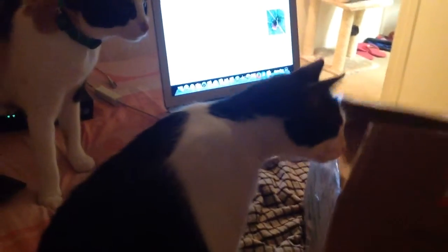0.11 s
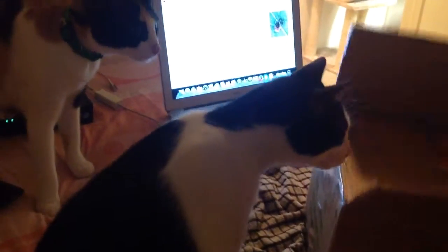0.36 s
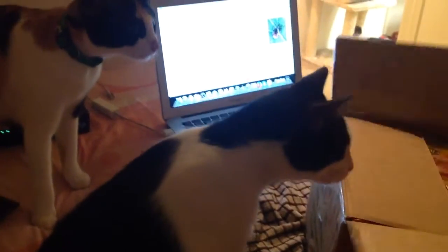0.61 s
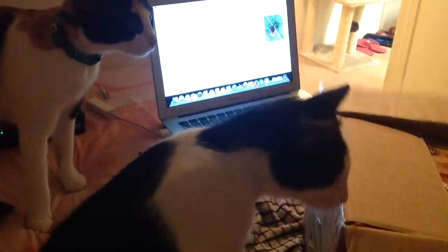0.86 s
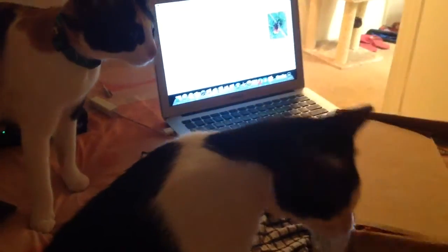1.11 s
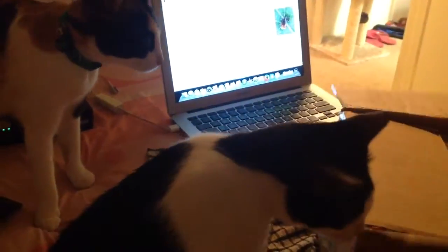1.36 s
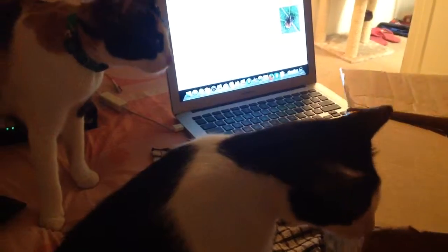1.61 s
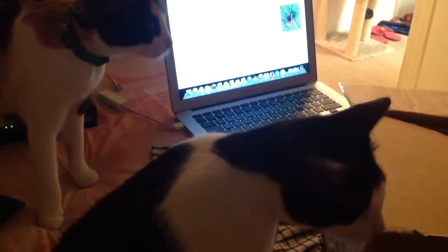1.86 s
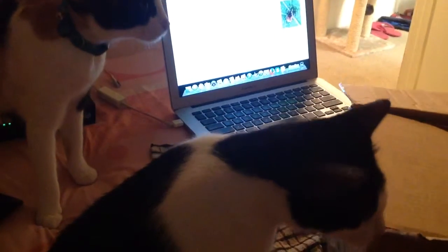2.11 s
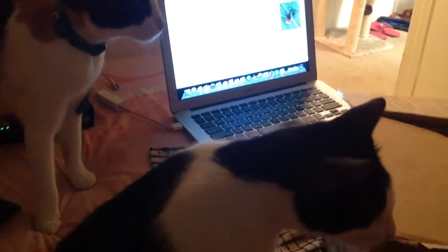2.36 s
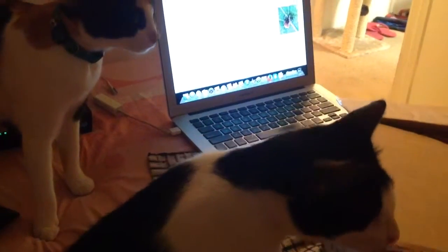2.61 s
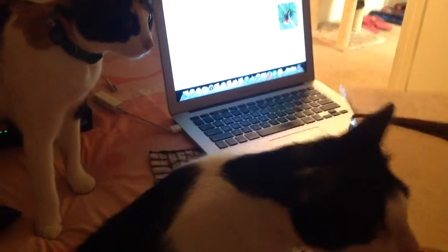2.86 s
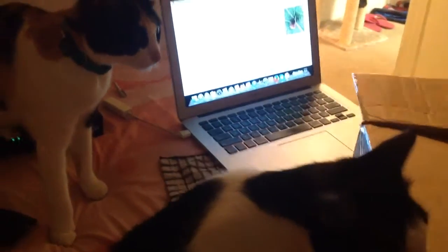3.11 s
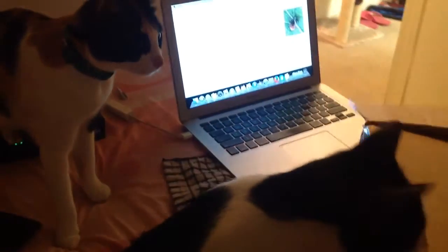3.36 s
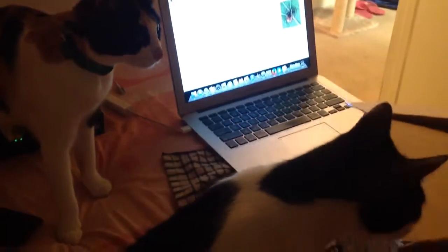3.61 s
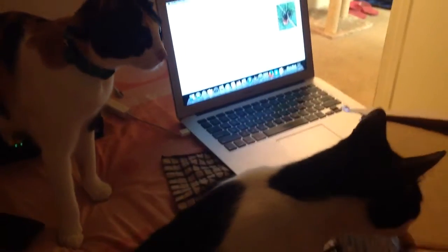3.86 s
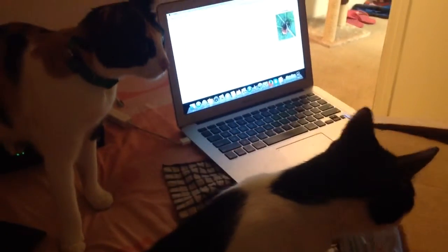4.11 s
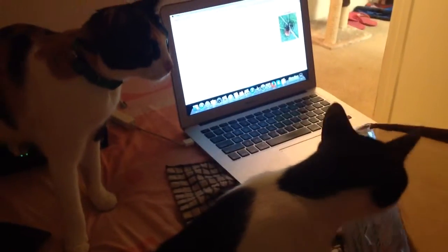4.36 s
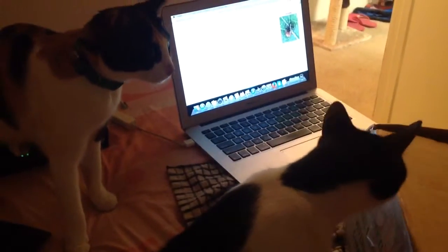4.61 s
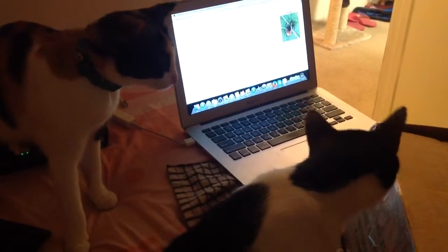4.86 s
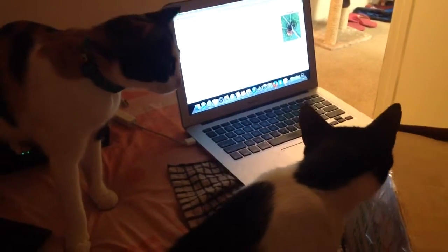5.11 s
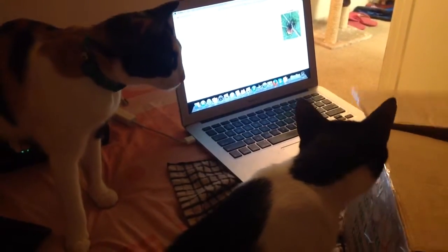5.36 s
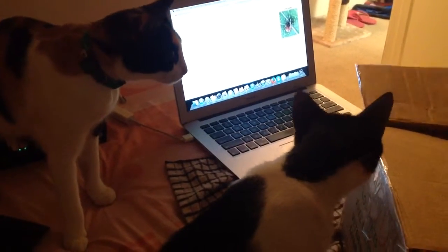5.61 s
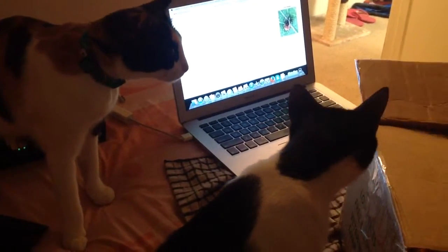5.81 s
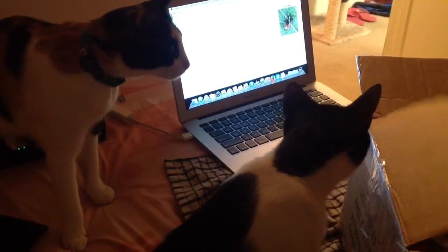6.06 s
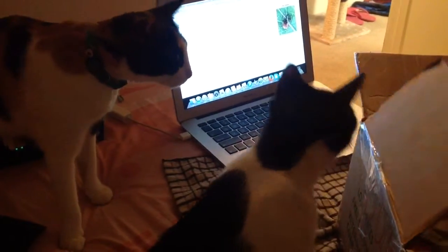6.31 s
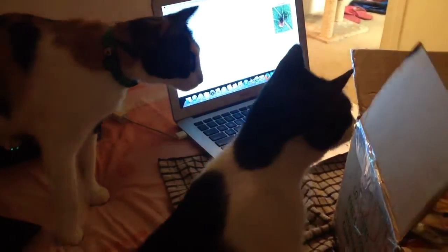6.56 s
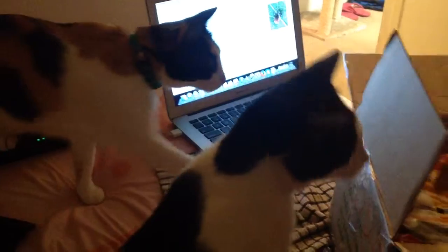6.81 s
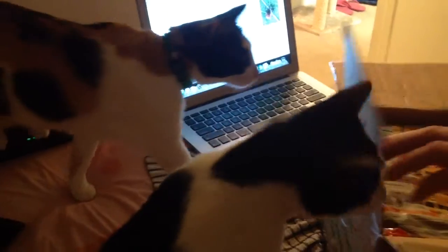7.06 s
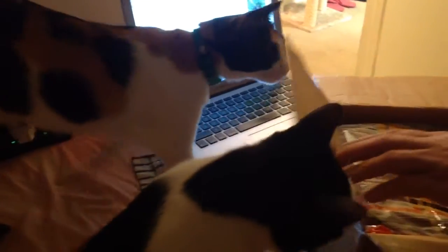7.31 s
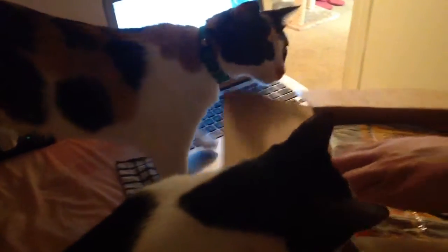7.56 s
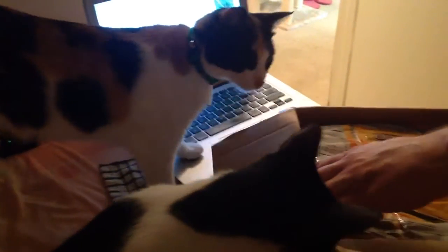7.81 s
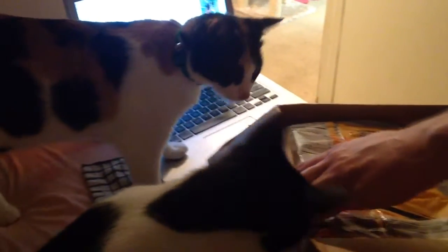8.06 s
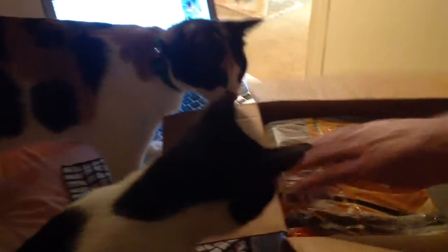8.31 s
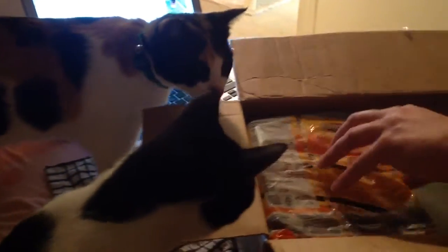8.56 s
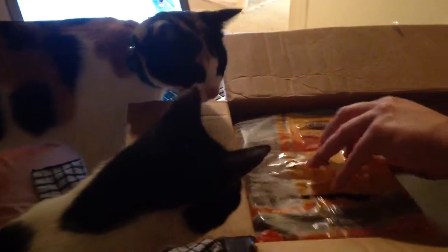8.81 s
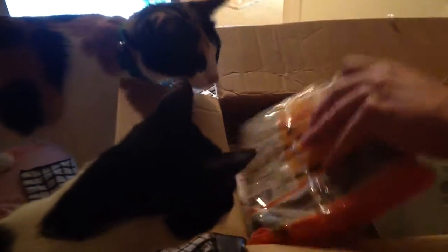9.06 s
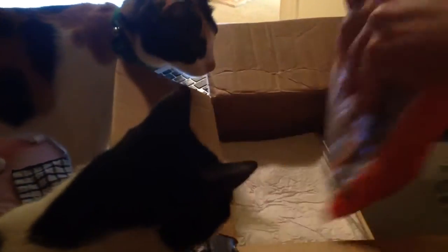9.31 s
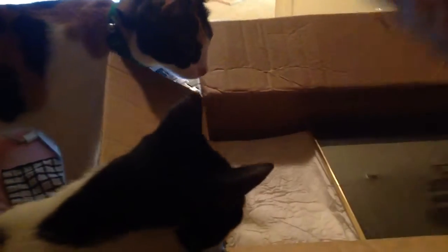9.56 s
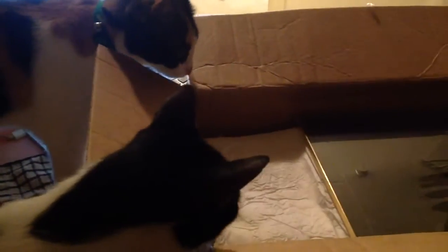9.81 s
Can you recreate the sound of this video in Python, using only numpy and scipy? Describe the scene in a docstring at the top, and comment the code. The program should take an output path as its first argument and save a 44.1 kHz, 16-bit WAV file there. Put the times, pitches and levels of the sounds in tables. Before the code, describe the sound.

Close handling of a cardboard box: sharp snaps, soft rubs and brief flap creaks over faint hiss, then loud crinkling of plastic.

```python
"""A cardboard box is opened on a bed in a small quiet room, close to a phone, over hiss and faint hum.
Light snaps and rubs come first, a flap creaks near 0.7 and 1 s, tape and plastic snap hard from 1.7 to 3 s;
sparser handling follows, with a creak near 4 s, then a dense, loud crackle from 8.6 s to the end.
Snaps are decaying noise bursts, rubs are swelling hiss and crackle, creaks are stick-slip pulses in a
resonant flap; all are filtered to the range of cardboard and followed by echoes that swell in milliseconds."""
import sys
import numpy as np
from scipy import signal
from scipy.fft import rfft, irfft, next_fast_len
from scipy.io import wavfile
from scipy.ndimage import uniform_filter1d

SR = 44100
rng = np.random.default_rng(int(sys.argv[2]) if len(sys.argv) > 2 else 0)


def ratio(d):
    """dB to gain"""
    e = np.asarray(d, float) / 20
    return 10 ** e


def to_wav(sig):
    """Store sig (one row per channel, or 1-D mono) as 16-bit WAV at the path in sys.argv[1].

    Samples outside -1..1 are clipped; the rate is SR.
    """
    pcm = np.clip(np.atleast_2d(sig), -1, 1) * 32767
    pcm = np.round(pcm).astype(np.int16)
    wavfile.write(sys.argv[1], SR, pcm.T)  # frames by channels


N = 437913
TIME_S = np.arange(N) / SR

# room air and hiss spectrum: (frequency [Hz], relative density [dB per Hz])
AIR_SPECTRUM = [(15, -61), (25, -35), (49, -23), (87, -18), (127, -2), (301, -6), (344, -5), (560, -10),
                (677, -6.5), (962, -12), (1440, -12), (14800, -20.5), (16000, -15)]
# hum tones: (frequency [Hz], mean level [dB rms])
HUM_TONES = [(59.5, -96.5), (119, -86.5), (140, -83)]
# cardboard modes: (frequency [Hz], width [Hz], gain [dB])
CARDBOARD_MODES = [(200, 80, -12), (283, 48, 0.5), (460, 58, 3), (612, 68, -6), (837, 280, -9.5),
                   (1026, 35, -11.5), (1350, 116, -14)]
# flap resonances: (frequency [Hz], width [Hz], gain [dB])
FLAP_MODES = [(417, 43, 6.5), (2350, 370, -3), (3520, 1000, 0.5), (4830, 960, -1.5), (8400, 5400, -3.5),
              (13500, 3000, -8)]
# vibrating parts: (low edge [Hz], high edge [Hz], shortest snap decay [ms], smooth share of rustle power [0-1],
# room t60 [s], echo gain [dB])
PARTS = [(160, 496, 4.7, 0.68, 0.24, 3.5), (614, 1490, 1.95, 0.49, 0.24, 4),
         (1610, 3400, 0.13, 0.3, 0.27, 2), (3880, 6700, 0.23, 0.35, 0.27, 2.5),
         (7530, 14240, 0.14, 0.47, 0.26, 5.5)]
# creaking flap, one list a creak: (time [s], slip rate [1/s], relative level [dB])
CREAKS = [
    [(.646, 90, -62), (0.6661, 96, -53), (.683, 87, -52), (0.717, 62, -47.5), (.74, 79, -47.5),
     (.771, 85, -51), (.787, 113, -46.5), (.805, 90, -43), (0.821, 96, -50), (.846, 47, -51),
     (.87, 58, -68)],
    [(1.016, 56, -57), (1.05, 55, -48)],
    [(4.037, 92, -59), (4.07, 88, -58), (4.11, 71, -63)],
]
# rubs and rustles by hands and paws: (loudest time [s], nominal length [s], dry level [dB rms],
# strongest pitch [Hz], fall below it [dB per octave], fall above it [dB per octave])
RUBS = [(0.01, 0.067, -65, 860, 7, 0.5), (0.117, 0.15, -67.5, 5790, 0, 0),
        (0.202, 0.076, -58.5, 6890, 1, -5), (0.364, 0.13, -68.5, 8190, 2, 2),
        (0.792, 0.088, -64, 6650, 1.5, 11), (0.94, 0.12, -71, 800, 7, 0.5), (1.218, 0.091, -56, 920, 8, 2),
        (1.284, 0.14, -57, 1210, 6.5, 0.5), (1.42, 0.15, -68, 1400, 8, 0.5),
        (1.691, 0.14, -72, 4000, 0.5, 3), (1.865, 0.16, -71, 6890, 0.5, 10),
        (1.944, 0.11, -59, 5790, 8, 12), (2.05, 0.084, -58.5, 1140, 7, 3.5),
        (2.132, 0.08, -65.5, 6890, 0.5, 5), (2.3, 0.16, -69.5, 3330, 1.5, 3),
        (2.493, 0.1, -64, 6650, 1.5, -1), (2.616, 0.14, -79.5, 2900, -2.5, 6),
        (2.973, 0.18, -55.5, 3100, 5.5, 5), (3.118, 0.21, -70, 3000, 2.5, -0.5),
        (3.275, 0.17, -68, 2120, 2, 0), (3.386, 0.069, -64.5, 1400, 1, 3), (3.51, 0.18, -66.5, 1450, 6, 2),
        (3.765, 0.11, -69.5, 900, 2, 0.5), (3.809, 0.084, -53, 500, 9, 4), (3.836, 0.055, -48, 4280, 3, 6),
        (3.87, 0.19, -65, 6000, 4, 1), (4.05, 0.43, -75, 3440, 2.5, 2.5),
        (5.168, 0.19, -60.5, 7000, 4.5, 1.5), (5.278, 0.16, -65, 7000, 6, 0),
        (5.397, 0.098, -73.5, 3000, 8, 2), (5.69, 0.16, -72.5, 4000, 6, 6), (5.898, 0.14, -73.5, 920, 3, 0),
        (6.66, 0.23, -73, 270, 25, 4), (7.296, 0.25, -86, 800, 11, -1.5), (7.495, 0.082, -69, 2800, 5, -1),
        (7.66, 0.08, -62, 7380, 13, 0), (7.8, 0.14, -66, 4710, 3, -1.5), (7.997, 0.12, -76, 7130, 1, 3),
        (8.288, 0.16, -62.5, 4240, 7, 2.5), (8.418, 0.11, -69.5, 3440, 9, -3),
        (8.565, 0.084, -68, 4100, 3, 6), (8.662, 0.072, -46, 2040, 5.5, 21),
        (8.869, 0.13, -56, 6000, 1, 13), (8.991, 0.12, -41.5, 1670, 6, 4),
        (9.112, 0.14, -45.5, 3440, 4.5, 3.5), (9.213, 0.15, -42.5, 3570, 4.5, 11),
        (9.36, 0.074, -48.5, 1400, 9, 2), (9.445, 0.065, -48.5, 1910, 5, 2),
        (9.56, 0.08, -45, 4800, 2.5, 5), (9.655, 0.13, -58.5, 3330, 3, 4), (9.78, 0.2, -67, 2440, 4, 2),
        (9.92, 0.14, -53, 1260, 11, 4.5)]
# snaps and taps: (time [s], dry level [dB rms over 1 ms], ring of the struck patch [Hz],
# fall below it [dB per octave], fall above it [dB per octave])
SNAPS = [(0.0549, -44.5, 494, 5, 3), (0.0748, -43, 5730, 10, 10), (0.1753, -37, 1660, -0.5, -0.5),
         (0.4055, -54, 6890, 0, 1), (0.4597, -45, 300, 4, 0), (0.51, -53, 1910, 4, 1),
         (1.0583, -50.5, 8480, 1, 9), (1.073, -58, 3500, 7, 0), (1.654, -55, 2010, 4, 0.5),
         (1.6793, -37, 4300, 5, 10), (1.7903, -35, 5000, 7, -1), (1.9117, -44.5, 5790, 2, 25),
         (1.9299, -35.5, 5840, 2.5, 4), (1.942, -36.5, 7910, 4, 6), (2.02, -44, 1450, 7, 17),
         (2.0513, -39, 915, 1.5, 0.5), (2.1558, -22, 2730, 14.5, 6.5), (2.2123, -23, 3080, 11.5, 11),
         (2.4246, -35.5, 2970, 7, 1.5), (2.477, -50, 6430, 6, 0), (2.508, -36.5, 2900, 7, 6),
         (2.6293, -59, 4100, -1, 13), (2.6418, -44, 776, 20, 2.5), (2.7478, -53, 8780, 3, 2),
         (2.7936, -36, 3630, 8.5, 9), (2.8738, -29, 5500, 9.5, 9.5), (2.9278, -34.5, 6000, 5.5, 9),
         (2.953, -29.5, 3000, 7.5, 2), (3.0051, -48, 1980, -0.5, -2.5), (3.0388, -39.5, 1350, 6, 6),
         (3.1645, -47, 360, 1, 1.5), (3.1873, -44.5, 710, 21, 6), (3.285, -62, 756, 0, 14),
         (3.3999, -45.5, 740, 20, 6), (3.451, -51, 3230, 0.5, 7), (3.4912, -42.5, 470, -1, 1.5),
         (3.4962, -37.5, 2500, 1, 5.5), (3.9495, -52.5, 3080, 8, -2.5), (4.349, -65, 3500, 10, -3),
         (4.5747, -54.5, 6210, 5, 7), (5.1355, -53, 9090, 1, 0), (5.1603, -42, 4230, 7, 6),
         (5.1806, -38, 2660, 5.5, 6), (5.1882, -43, 6000, 2.5, 6), (5.2235, -46, 1200, 15, 9),
         (5.2341, -43.5, 1050, 14, 0), (5.2557, -34.5, 2000, 6.5, 3.5), (5.2616, -55, 1800, 8, 7),
         (5.768, -36, 4000, 7.5, 12), (5.7907, -45, 300, 1, 2.5), (5.811, -33, 4100, 5.5, 11),
         (5.878, -49, 300, 14, 10), (5.915, -42.5, 273, 2, 2), (6.1217, -46, 850, -0.5, 0),
         (6.96, -60.5, 9740, 4, 0), (7.077, -52.5, 6600, 2, 1), (7.1896, -55, 686, 1, 2),
         (7.3921, -50, 5250, 14, 7), (7.3955, -38, 5540, 20, 15), (7.5508, -44, 5120, 14, 4),
         (7.553, -40.5, 5400, 17, 6), (7.6439, -39.5, 1550, 13.5, 2), (7.7246, -50.5, 8190, 3.5, -3),
         (7.8244, -42.5, 4540, 8.5, 6), (7.886, -44.5, 4700, 14, 5), (7.8987, -49, 8160, 10, 0),
         (7.9352, -45.5, 4700, 11, 7), (8.2794, -42.5, 6000, 5.5, 18), (8.2918, -49, 4390, 12, 0),
         (8.307, -48.5, 1440, 8, 0.5), (8.328, -42, 6430, 14, 25), (8.3426, -44.5, 2580, 12, -1),
         (8.408, -44.5, 1380, 8, -1), (8.508, -53, 1020, 0, 2.5), (8.629, -48, 590, 3, 3),
         (8.64, -35, 585, 9, 3.5), (8.654, -35, 4870, 15, 8), (8.6639, -24.5, 8700, 6, 1),
         (8.6845, -21, 5300, 16, 12), (8.6936, -30, 2800, 14, 21), (8.717, -39, 1030, 4, 17),
         (8.7498, -25, 3400, 4.5, 5), (8.8131, -40, 2050, 8, 3), (8.863, -37, 3210, 2, 5),
         (8.883, -37, 970, 10.5, 1.5), (8.91, -36.5, 3820, 4, 6.5), (8.9475, -41, 3690, 5, 5),
         (8.9582, -36.5, 5790, 4, 23), (8.9803, -28, 4100, 6.5, 2), (9.0034, -28, 2400, 4, 2),
         (9.021, -29.5, 3800, 2.5, 2), (9.0632, -31, 1720, 6.5, 1.5), (9.0879, -34.5, 1470, 5, 0),
         (9.1006, -32.5, 4000, 2.5, 0.5), (9.1595, -37.5, 3210, 2, 0), (9.1825, -25, 2900, 8.5, 3),
         (9.2057, -37.5, 8400, 0.5, -14), (9.227, -27, 5600, 13, 5), (9.2376, -34, 7640, 3, 2),
         (9.3289, -35, 5400, 3.5, 7), (9.3588, -42, 4100, 1.5, 18), (9.379, -33.5, 5170, 4, 4),
         (9.4191, -36, 1400, 16, 4), (9.4485, -38, 650, 5, 0.5), (9.4834, -24.5, 4600, 3.5, 2.5),
         (9.4949, -37, 2900, 8, 12), (9.5218, -23.5, 1940, 8.5, 4), (9.574, -33, 8700, 6, -3),
         (9.5938, -33, 4700, 3.5, 16), (9.8359, -31, 1350, 6.5, 6), (9.872, -39, 2100, 5, 7),
         (9.9032, -40, 2370, 20.5, 5), (9.9258, -37.5, 1220, 2, 7)]

AIR_DB = -64.5
STILL_S = 0.11  # an echo pattern holds this long
WALL_MS, SWELL_MS, DENSE_MS = 0.38, 2.2, 24.0
NEAR_DB, NEAR_MS = 3.5, 9.1
GRAINS_PER_S, GRAIN_SCATTER_DB, CLUMP_DB = 300, 5, 3.5
STIR_DB = -83  # the bedding never quite rests
RUB_RISE, RUB_FALL = 0.62, 0.81  # shares of the nominal length
PATCH_Q, PATCH_DB = 3.1, 3.5
TEAR_CYCLES = 1  # added decay, in cycles of the patch: low patches give way slower


def unit(x):
    """Scale to rms 1."""
    return x / np.sqrt(np.mean(x ** 2))


def band(x, low_hz, high_hz, order=2):
    """Band-pass along the last axis."""
    return signal.sosfilt(signal.butter(order, [low_hz, high_hz], "band", fs=SR, output="sos"), x)


def walk(rate_hz):
    """Random levels held 1 / rate_hz and smoothed twice."""
    hold = int(SR / rate_hz)
    steps = np.repeat(rng.standard_normal(N // hold + 1), hold)
    return 1.07 * uniform_filter1d(uniform_filter1d(steps, hold), hold)[:N]


def ring(x, modes):
    """Resonators side by side."""
    return sum(ratio(db) * signal.lfilter(*signal.iirpeak(hz, hz / width_hz, fs=SR), x)
               for hz, width_hz, db in modes)


def share_db(part, level_db, hz, below, above):
    """Level of a part: changes by the given slope for every octave from the strongest pitch."""
    octaves = np.log2(np.sqrt(PARTS[part][0] * PARTS[part][1]) / hz)
    return level_db - np.where(octaves < 0, -below, above) * octaves


def shake(x, part):
    """Cardboard modes and a one-pole treble slope, limited to the range of one part."""
    x = signal.lfilter([1], [1, -0.28], x + ring(x, CARDBOARD_MODES))
    return band(x, *PARTS[part][:2], order=3)


def air():
    """Room air and microphone hiss as shaped noise, slowly wavering, with a faint mains hum."""
    hz, db = np.transpose(AIR_SPECTRUM)
    size = next_fast_len(N)
    bins_hz = np.fft.rfftfreq(size, 1 / SR)
    colour = ratio(np.interp(np.log(bins_hz + 1), np.log(hz), db))
    hiss = unit(irfft(rfft(rng.standard_normal(size)) * colour, size)[:N])
    hiss = hiss * ratio(AIR_DB + 0.44 * walk(4.33))
    hum = sum(np.sqrt(2) * ratio(db + 0.74 * walk(2.6)) * np.sin(2 * np.pi * hz * TIME_S)
              for hz, db in HUM_TONES)
    return hiss + hum


def reflections():
    """Random echo patterns, one per still span: lone reflections first, then a dense wash."""
    t_ms = np.arange(SR // 3) / SR * 1000
    shape = (-(-N // int(STILL_S * SR)), len(t_ms))
    density = np.clip((t_ms / DENSE_MS) ** 2, 0.05, 1)
    swell = 1 - np.exp(-np.maximum(t_ms - WALL_MS, 0) / SWELL_MS)
    # bed, box sides and the nearest wall answer louder than the rest of the room
    swell = swell * (1 + ratio(NEAR_DB) * np.exp(-t_ms / NEAR_MS))
    hits = (rng.random(shape) < density) * rng.standard_normal(shape)
    return swell * hits / np.sqrt(density)


def room(x, pattern, t60_s, echo_db):
    """Direct sound plus exponentially fading echoes, each span convolved with its own pattern."""
    echoes = pattern * np.exp(-np.log(1000) * np.arange(pattern.shape[1]) / SR / t60_s)
    echoes = echoes / np.sqrt(np.sum(echoes ** 2, axis=1, keepdims=True))
    step = int(STILL_S * SR)
    pieces = np.pad(x, (0, -N % step)).reshape(-1, step)
    out = np.zeros(N + step + pattern.shape[1])
    for k, piece in enumerate(signal.fftconvolve(pieces, echoes, axes=1)):
        out[k * step:k * step + len(piece)] += piece
    return x + ratio(echo_db) * out[:N]


def creak():
    """The fold sticks and slips; every slip is a click and a short scrape into the flap's resonances."""
    slips = np.zeros(N)
    for rows in CREAKS:
        s, rate, level_db = np.transpose(rows)
        phase = np.cumsum(np.interp(TIME_S, s, rate, 0, 0)) / SR + 0.4
        slips += np.diff(np.floor(phase), prepend=0) * ratio(np.interp(TIME_S, s, level_db))
    decay = signal.lfilter([1], [1, -np.exp(-1 / (0.0022 * SR))], slips)
    scrape = decay * np.sign(rng.standard_normal(N))
    return ratio(18.0) * ring(slips + 0.22 * scrape, FLAP_MODES)


def crackle():
    """Fine random clicks of scattered size that come in louder and softer clumps."""
    scatter = np.clip(rng.standard_normal(N), -2, 2)
    sizes = ratio(GRAIN_SCATTER_DB * scatter + CLUMP_DB * walk(40))
    hits = rng.random(N) < GRAINS_PER_S / SR
    return unit(hits * sizes * np.sign(rng.standard_normal(N)))


def handling(grains, part):
    """Each rub swells and fades; the same fine crackle shakes all parts, over a smooth rubbing hiss."""
    smooth = PARTS[part][3]
    power = np.full(N, ratio(2.0 * STIR_DB))
    for s, length_s, *colour in RUBS:
        rise_s, fall_s = length_s * RUB_RISE, length_s * RUB_FALL
        span = slice(max(int((s - rise_s) * SR), 0), int((s + fall_s) * SR))
        away = (TIME_S[span] - s) / np.where(TIME_S[span] < s, rise_s, fall_s)
        power[span] += ratio(2 * share_db(part, *colour)) * np.cos(np.pi / 2 * away) ** 4
    rustle = np.sqrt(smooth) * rng.standard_normal(N) + np.sqrt(1 - smooth) * grains
    return np.sqrt(power) * unit(shake(rustle, part))


def snaps(chance, part):
    """Each buckle is a sharp edge and a tiny decaying burst; every part rings with its own share."""
    size = chance.shape[1]
    decay_s = PARTS[part][2] / 1000 + TEAR_CYCLES / np.array(SNAPS)[:, 2:3]
    bursts = chance * np.exp(-np.arange(size) / (SR * decay_s))
    bursts = np.array([burst + ring(burst, [(row[2], row[2] / PATCH_Q, PATCH_DB)])
                       for row, burst in zip(SNAPS, bursts)])
    bursts = shake(bursts, part)
    # energy of 1 ms at rms 1
    bursts = bursts * np.sqrt(SR / 1000 / np.sum(bursts ** 2, axis=1, keepdims=True))
    out = np.zeros(N + size)
    for row, burst in zip(SNAPS, bursts):
        start = int(row[0] * SR)
        out[start:start + size] += ratio(share_db(part, *row[1:])) * burst
    return out[:N]


def scene():
    """Snaps, rubs and creaks sound in the room, over the air."""
    chance = rng.standard_normal((len(SNAPS), 2048))
    chance[:, 0] = 4.43 * np.sign(chance[:, 0])  # sharp edge
    grains = crackle()
    pattern = reflections()
    parts = sum(room(snaps(chance, k) + handling(grains, k), pattern, *PARTS[k][4:])
                for k in range(len(PARTS)))
    flap = room(creak(), pattern, 0.27, -3.0)
    # keep the range of the cardboard sounds; remove low thumps where echo patterns change
    near = band(parts + flap, 122, 14000)
    return (near + air())[None]


def roll_off(x):
    """The treble ends steeply here."""
    return signal.sosfilt(signal.butter(12, 16490, fs=SR, output="sos"), x)


def record(dry):
    """The phone cuts the very top with a steep low-pass."""
    top_hz = 15100
    low_pass = signal.ellip(6, 0.3, 30, top_hz, fs=SR, output="sos")
    mix = signal.sosfilt(low_pass, dry)
    return roll_off(mix)


dry = scene()
out = record(dry)
to_wav(out)
```